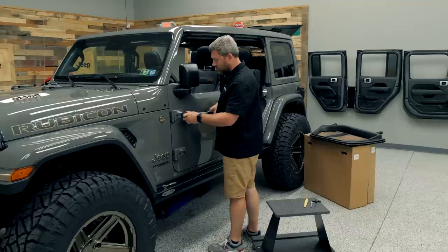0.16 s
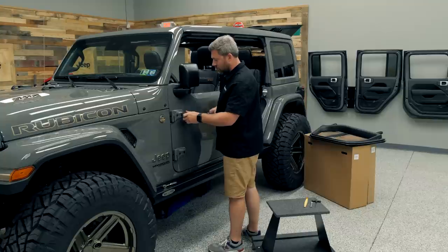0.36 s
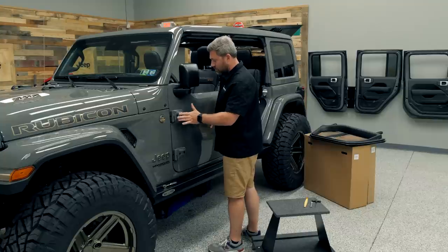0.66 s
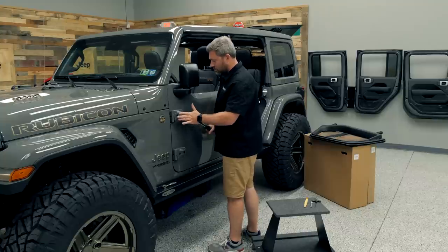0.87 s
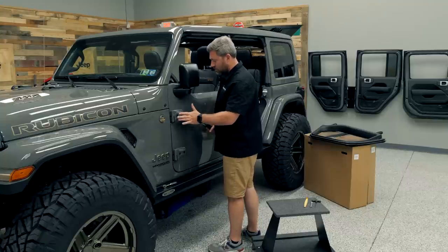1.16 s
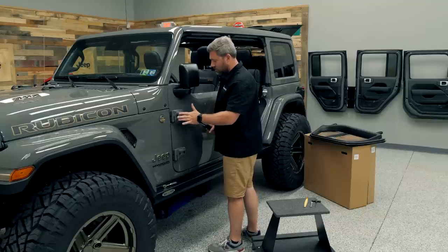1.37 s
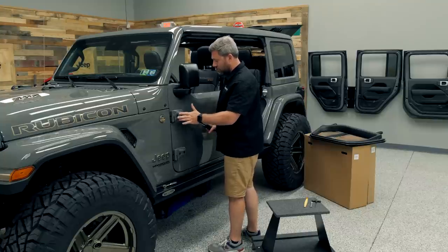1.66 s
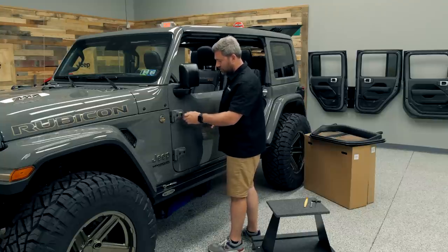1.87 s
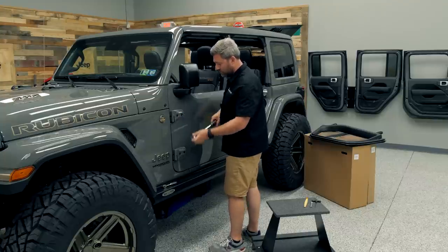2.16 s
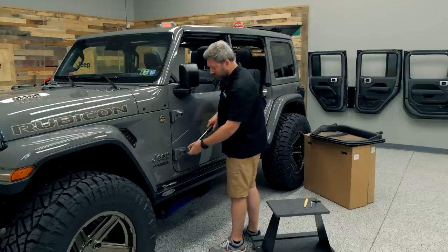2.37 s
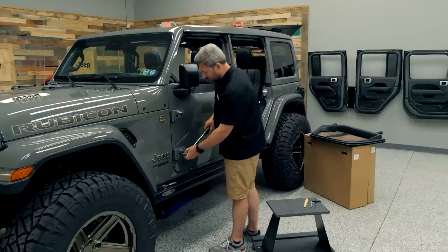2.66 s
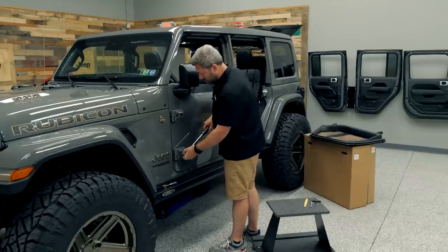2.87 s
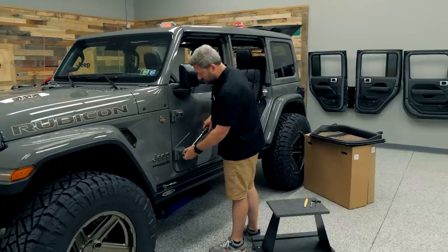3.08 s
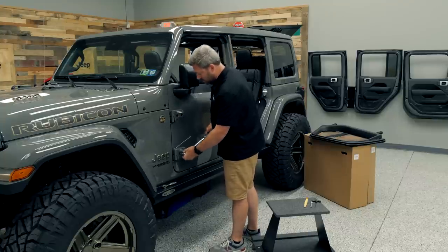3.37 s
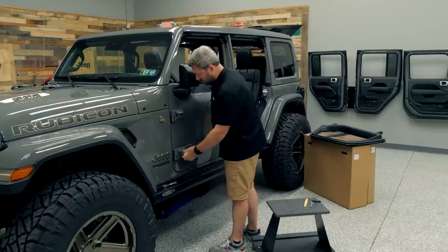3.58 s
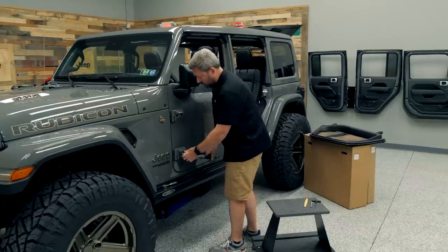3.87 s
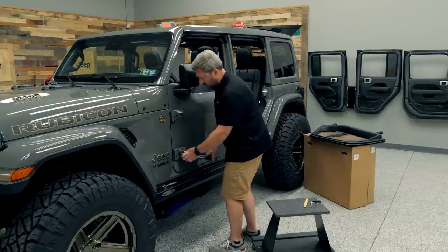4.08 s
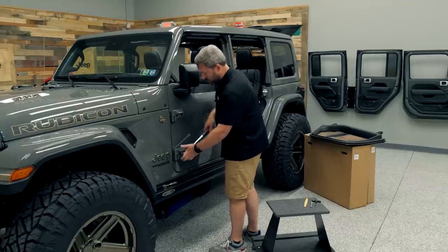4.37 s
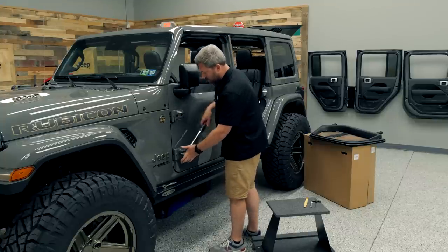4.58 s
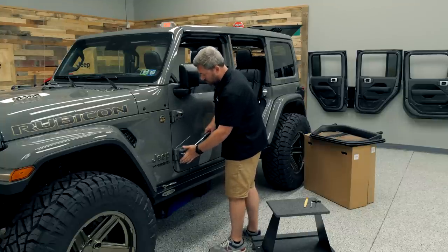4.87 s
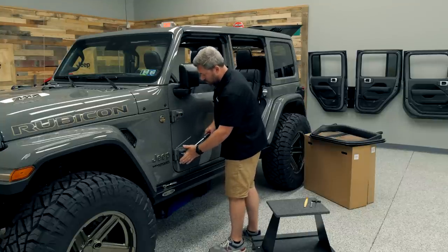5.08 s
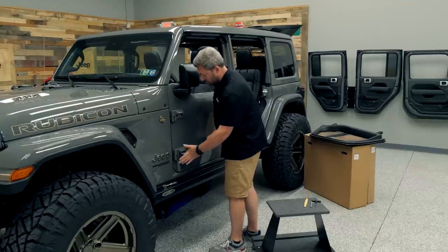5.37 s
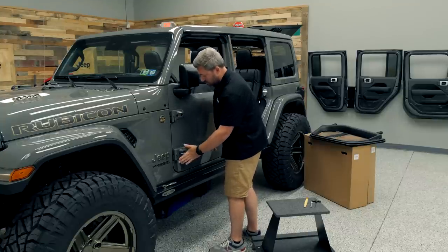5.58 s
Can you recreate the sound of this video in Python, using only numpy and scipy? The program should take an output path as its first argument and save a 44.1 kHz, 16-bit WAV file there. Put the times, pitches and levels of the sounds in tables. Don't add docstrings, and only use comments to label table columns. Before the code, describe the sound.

In a large, hard-walled workshop, a click-type torque wrench gives two bright steel snaps on door hinge bolts, each followed by a weaker reset click. Cloth and hands rustle, the socket settles lightly, then knocks firmly onto the next bolt, and six ratchet ticks follow. Soft thuds end the activity. Low ventilation rumbles throughout; the close microphone on the worker's chest picks up small low jolts, with a thin room tail.

```python
import sys
import numpy as np
from scipy import signal
from scipy.fft import rfft, irfft
from scipy.io import wavfile
from scipy.ndimage import uniform_filter1d

SR = 44100
rng = np.random.default_rng(int(sys.argv[2]) if len(sys.argv) > 2 else 0)


def transcribe(signal):
    frames = np.atleast_2d(signal).T
    limited = np.clip(frames, -1, 1)
    pcm = np.round(limited * 32767).astype(np.int16)
    wavfile.write(sys.argv[1], SR, pcm)


def to_linear_factor(level_db):
    exponent = np.asarray(level_db, float) / 20
    return 10 ** exponent


N = 252252

TOP_HZ = 15700
LEAD = SR // 200

# (frequency [Hz], level [dB], T60 [s])
TOUCHED_TOOL_MODES = [(612, -16, 0.017), (1030, 5.5, 0.037), (1277, -18, 0.025), (1900, -3, 0.18),
                      (2070, -50.5, 0.077), (2504, -66.5, 0.14)]


def along(table, hz):
    f, v = np.transpose(table)
    return np.interp(np.log(np.maximum(hz, 1)), np.log(f), v)


def colour(x, table):
    gain = to_linear_factor(along(table, np.fft.rfftfreq(len(x), 1 / SR)))
    return irfft(rfft(x) * gain, len(x))


def unit(x):
    return x / np.sqrt(np.mean(x ** 2))


def peak(x):
    return x / np.max(np.abs(x))


def band(x, lo_hz, hi_hz):
    return signal.sosfilt(signal.butter(2, [lo_hz, hi_hz], "bandpass", fs=SR, output="sos"), x)


def lowpass(x, hz):
    return signal.sosfilt(signal.ellip(8, .5, 60, hz, fs=SR, output="sos"), x)


def walk(rate_hz):
    k = int(SR / rate_hz)
    steps = np.repeat(rng.standard_normal(N // k + 1), k)
    smooth = uniform_filter1d(uniform_filter1d(steps, k), k)
    return unit(smooth[:N])


def local_power(spectrum, samples, width_hz):
    size = max(int(width_hz * samples / SR), 1)
    return np.abs(uniform_filter1d(np.abs(spectrum) ** 2, size=size))


def blur(x, width_hz):
    pulse = irfft(np.sqrt(local_power(rfft(x), len(x), width_hz)), len(x))
    return np.roll(pulse, LEAD)


def even(x, width_hz=900):
    spectrum = rfft(x)
    return irfft(spectrum / np.sqrt(local_power(spectrum, len(x), width_hz) + 1e-12), len(x))


def gestures(rows, rise_db_s, fall_db_s):
    t = np.arange(N) / SR
    start, hold, db = np.transpose(rows)[:, :, None]
    below = rise_db_s * np.maximum(start - t, 0) + fall_db_s * np.maximum(t - start - hold, 0)
    return np.sqrt(np.sum(to_linear_factor(db - below) ** 2, axis=0))


def air():
    # (frequency [Hz], level [dB])
    air_colour = [(12, -51.5), (20, -23), (59, 3), (85, -16), (122, -1), (148, -22.5), (266, -26.5),
                  (597, -42.5), (649, -41), (725, -31), (906, -30), (1500, -38.5), (15500, -45)]
    # (frequency [Hz], bandwidth [Hz], level [dB])
    drone_bands = [
        (53.7, 62, -71.5),
        (103.3, 4.4, -75),
    ]
    out = unit(colour(rng.standard_normal(N), air_colour)) * to_linear_factor(-62.5 + 0.13 * walk(2.2))
    for hz, width_hz, db in drone_bands:
        drone = unit(band(rng.standard_normal(N), hz - width_hz / 2, hz + width_hz / 2))
        out = out + to_linear_factor(db + 0.57 * walk(4.4)) * drone
    return out


def hall(x):
    # (frequency [Hz], T60 [s])
    hall_t60 = [(60, 1.3), (250, 1.3), (1000, 1.2), (3000, 1.2), (5400, .85), (7700, .66), (11000, .55),
                (16000, .42)]
    # (frequency [Hz], level [dB])
    hall_colour = [(60, 2.5), (250, 0), (1000, -2.5), (3000, -0.5), (6000, 6), (12000, 4.5), (16000, -8.5)]
    tail_db, tail_rise_s = -17.5, .015
    near_db, near_s = -14, 0.023
    wall_db, wall_s = -29, .028
    t, tail = np.arange(2 * SR) / SR, 0
    for hz in 45 * 2 ** np.arange(0, 8.6, .5):
        fade = np.exp(-np.log(1000) * t / along(hall_t60, hz))
        noise = band(rng.standard_normal(len(t)), hz / 1.19, hz * 1.19)
        tail = tail + to_linear_factor(along(hall_colour, hz)) * fade * noise
    tail = to_linear_factor(tail_db) * tail * (1 - np.exp(-t / tail_rise_s)) / np.sqrt(SR / 10)
    near = to_linear_factor(near_db) * np.exp(-t / near_s) * (t > .001) / np.sqrt(near_s * SR)
    wall = to_linear_factor(wall_db) * np.exp(-np.abs(t - wall_s) / .002) / 7
    response = tail + (near + wall) * rng.standard_normal(len(t))
    return lowpass(signal.fftconvolve(x, response)[:N], TOP_HZ)


def grip():
    # (start [s], hold [s], level [dB])
    grip_times = [(.04, .05, -46), (.2, 0.084, -57), (.79, .02, -56), (1.63, 0.27, -52), (2.15, 0.9, -60.5),
                  (3.06, .04, -52), (3.5, 0.11, -61), (3.82, .04, -55), (4.55, 0.051, -46),
                  (5.0, 0.035, -62), (5.25, 0.35, -60.5)]
    rumble = unit(band(rng.standard_normal(N), 60, 340))
    return rumble * to_linear_factor(-12 + 2 * walk(23)) * gestures(grip_times, rise_db_s=57, fall_db_s=50)


def slides():
    # (start [s], hold [s], level [dB])
    slide_times = [
        (.225, 0.077, -73),
        (.39, 0.049, -84),
        (2.05, 0.018, -73.5),
        (2.11, 0.039, -76.5),
        (2.243, .01, -76),
        (2.41, 0.011, -81),
        (3.696, .02, -77),
        (3.8, .11, -76),
    ]
    grains = rng.standard_normal(N) * to_linear_factor(2.7 * rng.exponential(size=N) + 2 * walk(61))
    return unit(band(grains, 870, 4800)) * gestures(slide_times, rise_db_s=602, fall_db_s=90)


def cloth():
    # (start [s], hold [s], level [dB])
    cloth_times = [
        (.005, 0.0071, -73.5),
        (1.85, 0.05, -68),
        (1.95, 0.19, -71),
        (2.2, 0.048, -68),
        (2.41, .02, -78),
        (4.145, 0.14, -72.5),
        (4.33, 0.25, -78),
        (4.67, 0.033, -76),
    ]
    # (frequency [Hz], level [dB])
    cloth_colour = [(1760, -47), (3000, -49), (5110, -5.5), (6040, -7), (8230, 3.5), (11200, 3),
                    (14000, -2.5), (16000, -12)]
    brush = unit(colour(rng.standard_normal(N), cloth_colour)) * to_linear_factor(walk(25))
    return brush * gestures(cloth_times, rise_db_s=205, fall_db_s=260)


def ring(modes, t, longest_s, scatter_db):
    hz, db, t60 = np.transpose(modes)[:, :, None]
    chance = rng.standard_normal((2, len(modes), 1))
    fade = np.exp(-np.log(1000) * t / np.clip(t60, .003, longest_s))
    wave = np.sin(2 * np.pi * hz * (1 + 0.0037 * chance[1]) * t)
    return np.sum(to_linear_factor(db + scatter_db * chance[0]) * fade * wave, axis=0)


def blows(events, modes, crack, rise_s, fall_s, crack_db, longest_s, door_db, door_s, jolt_db, door_top_hz,
          hall_db, jolt_hz=35.8):
    # (frequency [Hz], level [dB], T60 [s])
    door_modes = [(76, -7.5, 0.059), (112, -2.5, 0.42), (131, -15, 0.14), (153, 2, 0.18), (179, -4.5, 0.14),
                  (205, -4.5, 0.077), (256.6, -3, 0.083), (282, -5, 0.17), (335, -5.5, 0.083),
                  (434, -10, 0.06), (513, -6, 0.083), (537, -15, 0.18), (620, -9.5, 0.29),
                  (797, -13.5, 0.1), (897.7, -12, .05)]
    panel_rise_s, jolt_s = .0015, 0.037
    out, age = np.zeros((2, N + SR)), np.arange(SR // 3) / SR
    t = np.maximum(age - LEAD / SR, 0)
    contact = (1 - np.exp(-(t / rise_s) ** 2)) * np.exp(-np.maximum(t - rise_s, 0) / fall_s)
    onset = np.clip((age - LEAD / SR) / .0002 + 1, 0, 1)
    for s, steel_peak_db, panel_peak_db, shake_db in events:
        grains = rng.standard_normal(len(t)) * to_linear_factor(3 * rng.exponential(size=len(t)))
        rattle = even(contact * grains)
        bell = peak(np.convolve(rattle[:SR // 30], ring(modes, age, longest_s, 1.4))[:len(t)])
        burst = even(contact * rng.standard_normal(len(t)))
        snap = to_linear_factor(crack_db) * peak(colour(burst, crack))
        steel = to_linear_factor(steel_peak_db) * peak(bell + snap) * onset
        push = (1 - np.exp(-t / panel_rise_s)) * np.exp(-t / door_s)
        spread = (push * rng.standard_normal(len(t)))[:SR // 10]
        skin = signal.fftconvolve(spread, ring(door_modes, age, .13, 2.5))[:len(t)]
        panel = to_linear_factor(panel_peak_db + door_db) * peak(band(skin, 92, door_top_hz))
        jolt = to_linear_factor(shake_db + jolt_db) * np.sin(2 * np.pi * jolt_hz * t) * np.exp(-t / jolt_s)
        i = int(s * SR)
        out[0, i:i + len(t)] += steel + panel + jolt
        radiated = (blur(steel, 900) + blur(panel, 80)) * (age < LEAD * 3 / SR)
        out[1, i + LEAD:i + LEAD + len(t)] += to_linear_factor(hall_db) * radiated
    return out[:, LEAD:N + LEAD]


def thuds():
    # (time [s], steel peak [dB], door panel [dB], jolt [dB])
    thud_times = [
        (0.001, -45, -36.5, -53),
        (3.063, -49.5, -42.5, -89),
        (4.676, -48.5, -41.5, -65),
        (4.755, -50, -43.5, -80),
                  (3.919, -36, -31.5, -80),
    ]
    # (frequency [Hz], level [dB])
    thud_crack = [(240, -31.5), (400, 3.5), (575, -13), (1580, -20.5), (3150, -30.5), (4420, -33.5),
                  (6000, -36.5), (7800, -74), (13200, -120)]
    return blows(thud_times, TOUCHED_TOOL_MODES, thud_crack, rise_s=.0022, fall_s=.012,
                 crack_db=15, longest_s=.018, door_db=3, door_s=.022, jolt_db=0, door_top_hz=497, hall_db=-1.5)


def nudges():
    # (time [s], steel peak [dB], door panel [dB], jolt [dB])
    nudge_times = [
        (1.8153, -57, -55, -102),
        (1.8883, -65, -47, -93),
        (2.1093, -57, -60.5, -80),
        (3.278, -75, -62, -55),
        (4.5837, -49, -77.5, -78),
        (4.6098, -67, -71, -84),
        (4.6477, -62.5, -65, -88),
    ]
    # (frequency [Hz], level [dB])
    nudge_crack = [(410, -47), (700, -11), (1110, -9), (1630, -5), (2670, -21.5), (3000, -23), (6000, -40),
                   (7800, -36), (13200, -120)]
    return blows(nudge_times, TOUCHED_TOOL_MODES, nudge_crack, rise_s=.00051, fall_s=.0064, crack_db=6.5,
                 longest_s=.032, door_db=1.9, door_s=.0023, jolt_db=0, door_top_hz=510, hall_db=-4.5)


def teeth():
    # (time [s], steel peak [dB], door panel [dB], jolt [dB])
    tooth_times = [
        (1.929, -37, -72, -55),
        (4.251, -34, -51, -48),
        (4.312, -33, -49, -50),
        (4.368, -33.5, -48, -54),
        (4.419, -36, -44.5, -47.5),
        (4.466, -35, -37.5, -49.5),
        (4.527, -34.5, -47, -57),
    ]
    # (frequency [Hz], level [dB], T60 [s])
    tooth_modes = [(1110, -2, 0.21), (2360, -50, 0.026), (3070, -12, 0.033), (4670, -34, 0.027),
                   (6190, -34, 0.022), (7420, -4, 0.0057), (8700, -37, 0.029), (10070, 0, 0.029),
                   (9900, -17, 0.033), (11400, -33, 0.027), (12880, 15.5, 0.0017), (15300, -28, 0.02),
                   (13620, -35, 0.041), (13640, 4, 0.0069)]
    # (frequency [Hz], level [dB])
    tooth_crack = [(290, -41), (500, -5), (721, -15), (2320, -0.5), (2890, -2.5), (3450, 2), (5270, -7.5),
                   (7380, -8), (8420, -20.5), (13600, -3), (16500, -36)]
    return blows(tooth_times, tooth_modes, tooth_crack, rise_s=.00045, fall_s=.0021, crack_db=2.5,
                 longest_s=.02, door_db=.7, door_s=.015, jolt_db=7, door_top_hz=404, hall_db=-2.5)


def seats():
    # (time [s], steel peak [dB], door panel [dB], jolt [dB])
    seat_times = [
        (2.907, -30, -39.5, -42),
    ]
    # (frequency [Hz], level [dB], T60 [s])
    seat_modes = [(1060, -1, 0.15), (1230, -8, 0.062), (1900, -11, 0.055), (1897, -3, 0.008),
                  (2600, -25.5, 0.067), (2890, -8, 0.046), (3755, -19, 0.066), (4030, -24, 0.16),
                  (6500, -46, 0.59), (7079, -54, 5.0)]
    # (frequency [Hz], level [dB])
    seat_crack = [(290, -37), (500, -10), (1430, -11), (1840, 6.5), (2360, -15), (3880, -15.5), (4360, -63),
                  (14300, -37), (16500, -65.5)]
    return blows(seat_times, seat_modes, seat_crack, rise_s=.0004, fall_s=.0025, crack_db=3.6, longest_s=.033,
                 door_db=2.2, door_s=.0099, jolt_db=0, door_top_hz=495.6, hall_db=1.5, jolt_hz=90)


def knocks():
    # (time [s], steel peak [dB], door panel [dB], jolt [dB])
    knock_times = [
        (3.935, -12, -17.5, -27.5),
    ]
    # (frequency [Hz], level [dB], T60 [s])
    knock_modes = [(983, -4.5, 0.019), (1090, 8, 0.032), (1640, 4, 0.2), (1807, -15, 0.019), (2150, 8, 5.0),
                   (2470, -33.5, 0.2), (3030, -1.5, 0.062), (3900, -21.5, 0.052), (4640, -54.5, 0.14),
                   (5270, -30.5, 0.08), (5561, -63, 0.1), (6460, -15, 0.038), (6936, -62.5, 0.051),
                   (7400, -63, 0.092)]
    # (frequency [Hz], level [dB])
    knock_crack = [(290, -13.5), (500, -4), (795, -8.5), (1670, -6), (2650, -23.5), (3340, -16.5),
                   (3700, -27.5), (6230, -28.5), (8210, -44.5), (12500, -42.5), (16000, -56.5)]
    return blows(knock_times, knock_modes, knock_crack, rise_s=.00078, fall_s=.0039, crack_db=13, longest_s=.038,
                 door_db=1.3, door_s=.0064, jolt_db=0, door_top_hz=420, hall_db=-.5, jolt_hz=105.1)


def resets():
    # (time [s], steel peak [dB], door panel [dB], jolt [dB])
    reset_times = [
        (1.061, -23, -32, -65),
        (1.677, -24.5, -32, -60),
    ]
    # (frequency [Hz], level [dB], T60 [s])
    reset_modes = [(1217, 7.5, 0.14), (1436, 5, 0.0052), (1903, 0.5, 0.056), (3170, -18, 0.079),
                   (3290, -8, 0.034), (3412, -22.5, 0.066), (4710, -24.5, 0.081), (4915, -27.5, 0.069),
                   (5800, -26.5, 0.12), (8400, -31, 0.043), (10300, -21, 0.035), (11000, 0.5, 0.0035),
                   (12400, -33, 0.034), (14500, -24.5, 0.028)]
    # (frequency [Hz], level [dB])
    reset_crack = [(290, -30), (500, 1), (1950, -9), (2500, 2), (3020, -9.5), (3550, -3.5), (10800, -30.5),
                   (12000, -33.5), (15600, -31), (16500, -46)]
    return blows(reset_times, reset_modes, reset_crack, rise_s=.00017, fall_s=.0038, crack_db=2, longest_s=.018,
                 door_db=5.9, door_s=.025, jolt_db=-44.5, door_top_hz=560, hall_db=-4)


def snaps():
    # (time [s], steel peak [dB], door panel [dB], jolt [dB])
    snap_times = [
        (0.796, -8.5, -27.5, -36.5),
        (1.506, -11, -29.5, -29),
    ]
    # (frequency [Hz], level [dB], T60 [s])
    snap_modes = [(860, -6.5, 0.1), (1287, 3.5, 0.14), (1760, -6, 0.037), (2470, -4, 0.029),
                  (3100, -12.5, 0.13), (4200, -14.5, 0.051), (4470, -1, 0.069), (5540, -10.5, 0.081),
                  (6060, -10, 0.1), (6400, -15.5, 0.043), (7200, -10.5, 0.097), (7800, -21, 0.028),
                  (8339, -24, 0.023), (9130, -12, 0.045), (9560, -20.5, 0.058), (11400, -25.5, 0.25),
                  (11877, -22.5, 0.026), (12600, -6.5, 0.012), (12440, -13.5, 0.041), (10500, -18, 0.047),
                  (12824, -12.5, 0.052), (12100, -11.5, 0.031), (14200, -8, 0.037), (12800, -21.5, 0.077),
                  (15650, -20, 0.065), (15570, -18, 0.027)]
    # (frequency [Hz], level [dB])
    snap_crack = [(290, -42.5), (500, -6.5), (1310, -8.5), (2420, -13), (2680, -18), (3440, -5.5),
                  (4160, -15), (4810, -0.5), (6830, -16), (10900, -13.5), (12100, -5), (15000, -10),
                  (16400, -27.5)]
    early = np.array([.0007, 0, 0, 0])
    return blows(snap_times - early, snap_modes, snap_crack, rise_s=.0022, fall_s=.0023, crack_db=6,
                 longest_s=.038, door_db=7.3, door_s=.011, jolt_db=10, door_top_hz=718, hall_db=1.5)


def scene():
    background = air() + grip() + slides() + cloth()
    near, sent = thuds() + nudges() + teeth() + seats() + knocks() + resets() + snaps()
    return (lowpass(near, 16200) + hall(sent) + lowpass(background, TOP_HZ))[None]


def roll_off(x):
    return signal.sosfilt(signal.butter(12, 16820, fs=SR, output="sos"), x)


def record(dry):
    return roll_off(dry)


dry = scene()
out = record(dry)
transcribe(out)
```